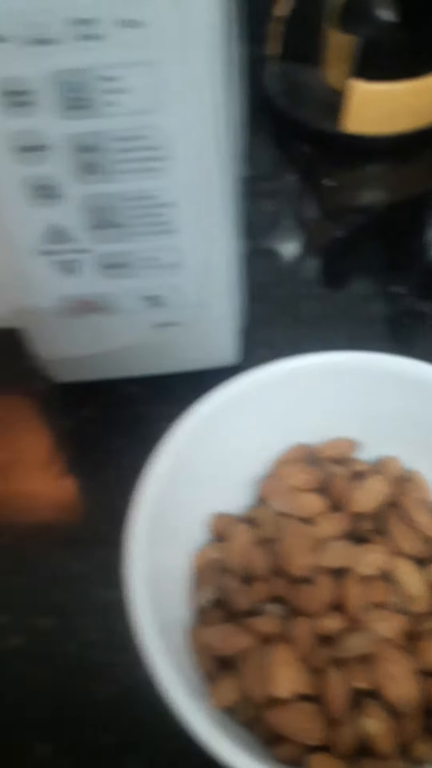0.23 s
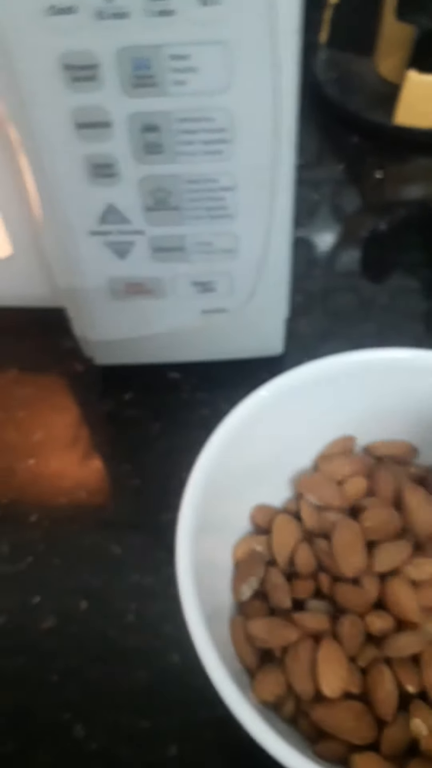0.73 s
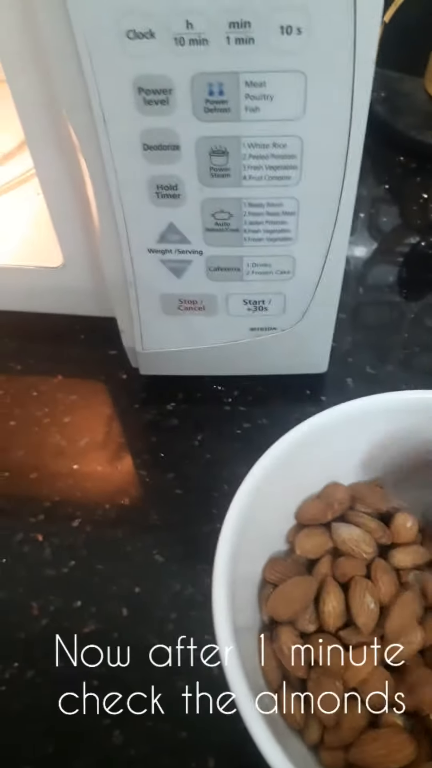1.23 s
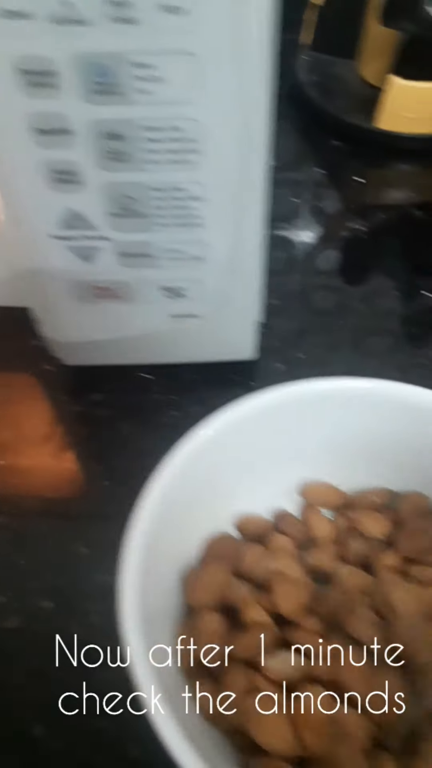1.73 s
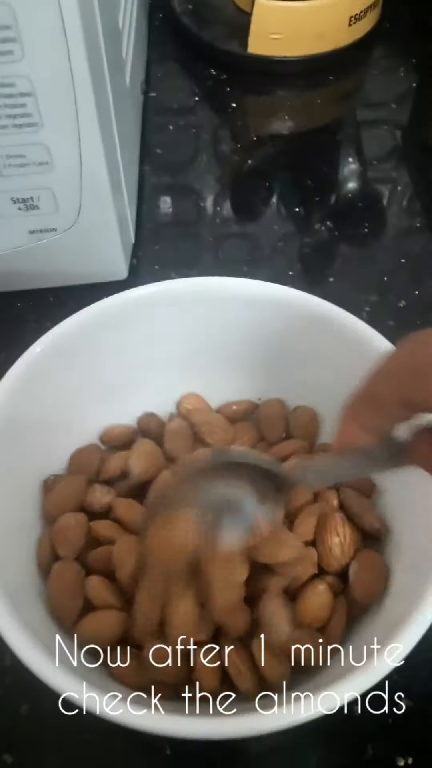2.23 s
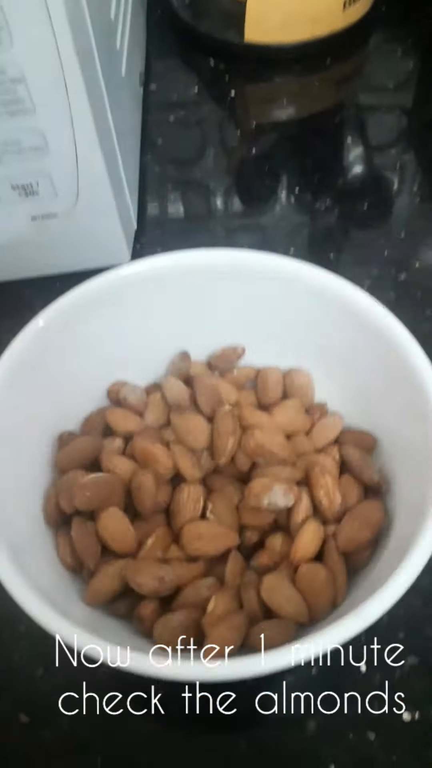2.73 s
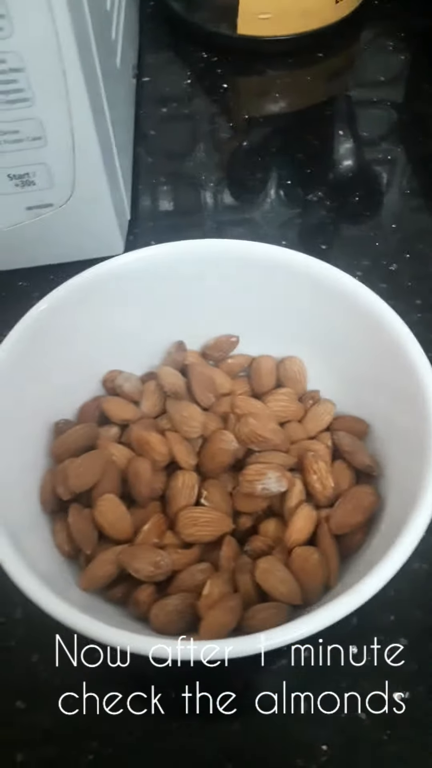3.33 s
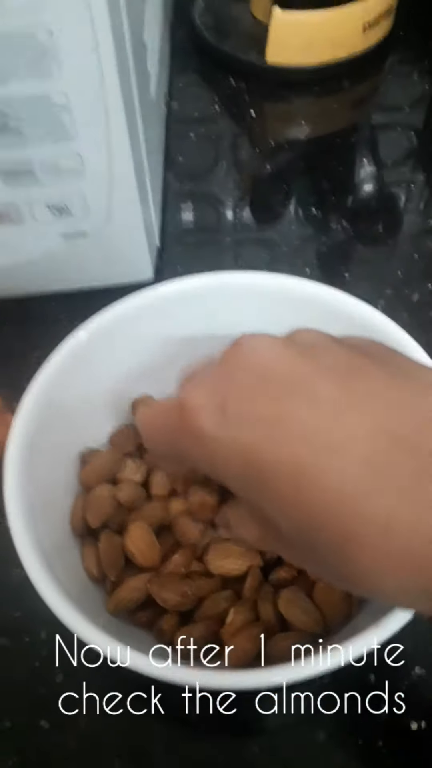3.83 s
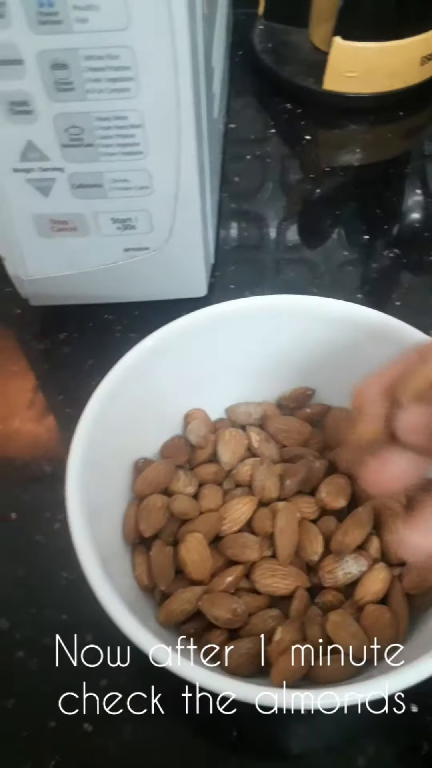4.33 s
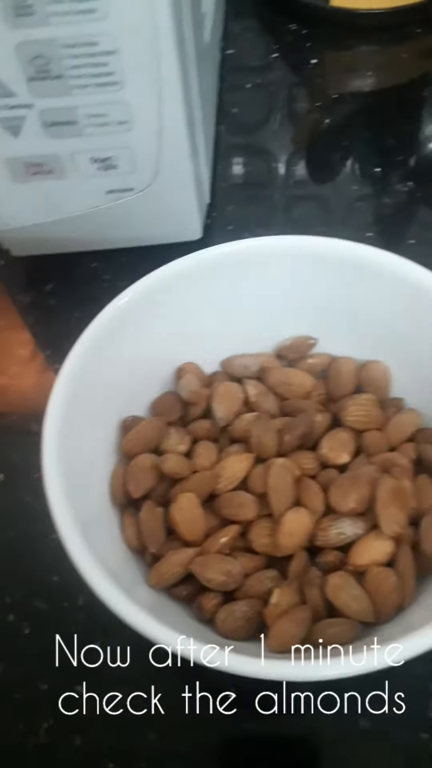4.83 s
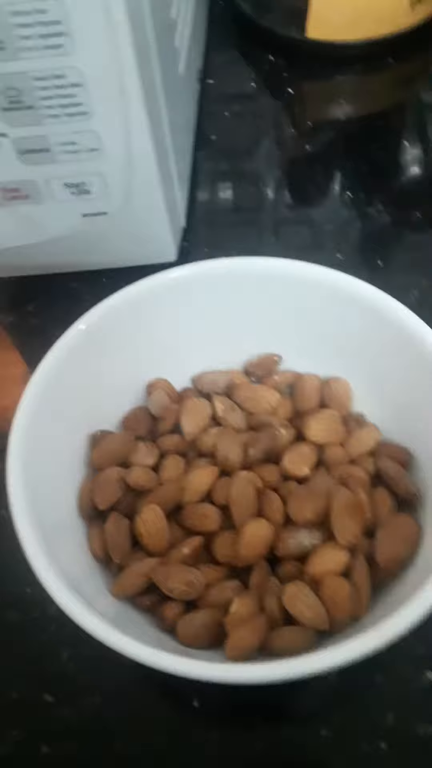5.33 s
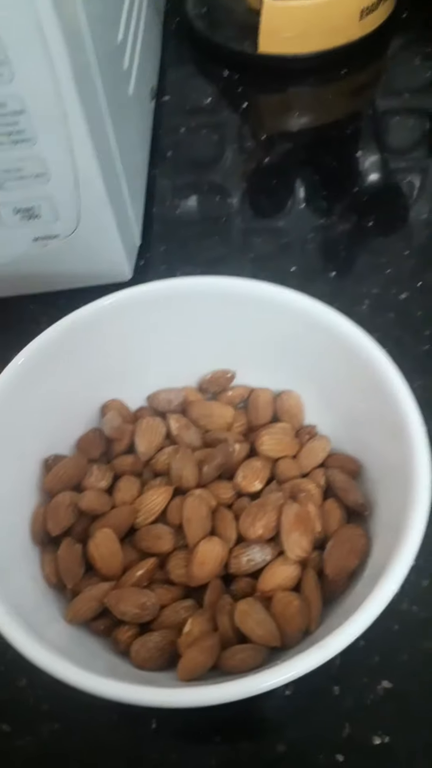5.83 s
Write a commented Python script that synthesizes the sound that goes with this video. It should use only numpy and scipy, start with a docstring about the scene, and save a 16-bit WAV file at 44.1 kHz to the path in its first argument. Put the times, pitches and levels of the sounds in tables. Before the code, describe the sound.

A small close microphone catches a metal spoon in a bowl of almonds: a sharp knock, gritty strokes, a bright ceramic chime, then softer stirring. A hard tap and a rapid metallic clatter follow as the spoon lands on the stone counter and rings out. Afterwards only soft nut rustle, faint fingertip hiss, small taps and a very low motor drone remain in the reverberant kitchen.

```python
"""A steel spoon stirs almonds in a ceramic bowl in a small hard-walled kitchen: damped modes knock, beating
pairs chime. Random grains driven through those modes and through a noise colour make the scrape and crunch of
the strokes. The spoon is put down on the stone counter, where it bounces, rings in freely dying modes and
chatters. Before, between and after, dry rubbing hisses in fine grains, a hand on the sliding spoon at first and
fingertips on almond skin later; fingers dig among the nuts once the spoon is down. A far motor drones as a sum
of harmonics over rumble and still air, and a low hum dies away at the outset."""
import sys
import numpy as np
from scipy import signal
from scipy.fft import rfft, irfft
from scipy.io import wavfile

SR = 44100
rng = np.random.default_rng(int(sys.argv[2]) if len(sys.argv) > 2 else 0)


def dump(signal):
    """Clip the signal to [-1, 1] and save it as 16-bit WAV at the path in sys.argv[1]."""
    limited = np.clip(np.atleast_2d(signal).T, -1, 1)
    pcm = np.round(limited * 32767).astype(np.int16)
    wavfile.write(sys.argv[1], SR, pcm)


N = 268083
TIME = np.arange(N) / SR

# Spoon touching the counter: (time [s], main mode level [dB], lift of the overtones [dB])
COUNTER_TOUCHES = [(0.086, -25.5, -19), (0.0894, -19.5, -8), (3.1897, -7, -10), (3.2177, -17, 5.5),
                   (3.2352, -10.5, -6), (3.2595, -20, 1.5), (3.2776, -15, -1.5), (3.3095, -16.5, 5),
                   (3.3245, -16.5, 0.5), (3.3385, -26, 2.5), (3.3589, -33, 17.5)]
# Noise colour of a hard contact: (frequency [Hz], relative density [dB per Hz])
CLICK_COLOUR = [(100, -25), (300, -17.5), (1000, -7.5), (2500, -4.5), (4000, -0.5), (6000, 6), (8300, -1),
                (9300, -13), (11000, -9.5), (15500, -16.5)]
# Strokes through the nuts: (start [s], length [s], relative scrape level [dB], relative crunch level [dB])
STIR_STROKES = [(0.631, 0.23, -43.5, -38), (0.965, 0.135, -44.5, -42.5), (1.271, 0.23, -47.5, -46.5),
                (1.604, 0.17, -49, -48.5), (1.981, 0.17, -48, -51.5), (2.278, 0.32, -44, -49.5)]
# Spoon held in the hand, damped by fingers and nuts: (frequency [Hz], relative level [dB], t60 [s])
HELD_SPOON_MODES = [(963, -20, 0.037), (1055, -22, 0.05), (1820, -17, 0.0069), (2620, -7, 0.03),
                    (2744, -8, 0.015), (5140, 3.5, 0.0069), (5450, -1, .015), (6750, -18, 0.067),
                    (9850, -17.5, 0.016), (11000, -15, 0.017), (13000, -9.5, 0.0061)]
# The bowl's chime: (frequency [Hz], relative level [dB], t60 [s], split of the mode pair [Hz],
# signed share of its twin [ratio])
BOWL_MODES = [(1346.5, -4.5, 0.7, 2, -0.7), (2491, -2, .72, 3.3, -.7), (3914, -4.5, 0.38, 6, 0.5),
              (5625, 2, 0.19, 13, 1), (7620, -16, 0.26, 13, .3), (9790, -30, .2, 12, -0.2),
              (10360, -28, 0.16, 12, 0.2), (12450, -29, 0.14, 15, 0.46)]
# Spoon against the bowl: (time [s], knock level [dB], contact sharpness [Hz], chime level [dB])
BOWL_TOUCHES = [(0.638, -33, 1200, -55), (0.668, -26.5, 6400, -57), (0.7, -3.5, 6400, -52.5),
                (0.8303, -21.5, 3220, -58), (0.849, -43.5, 3440, -45), (1.038, -27.5, 6050, -56.5),
                (1.131, -25.5, 2300, -52.5), (1.2624, -20, 14100, -54), (1.2653, -4.5, 13500, -17.5),
                (1.6208, -31.5, 2800, -48), (1.666, -33.5, 3200, -52), (1.992, -44.5, 2034, -62),
                (2.0141, -40, 5700, -68), (2.152, -43, 1370, -76), (2.2617, -43.5, 2980, -80),
                (2.295, -49, 6000, -53.5), (2.312, -33.5, 1490, -49.5), (2.3184, -34, 5000, -46),
                (2.3319, -39.5, 3393, -31.5), (2.579, -42.5, 2010, -57.5), (2.6684, -41, 8170, -64.5),
                (2.7826, -50.5, 2800, -75), (2.858, -47, 3600, -79), (4.4652, -37.5, 1230, -60),
                (4.575, -45, 2480, -88)]

NEUTRAL_CONTACT_HZ = 3400  # contact sharpness that leaves knock and chime untilted
LET_GO_S = 3.1  # the hand damps the spoon until this moment


def from_db(db):
    """Decibels to gain."""
    return 10 ** (np.asarray(db) / 20)


def rms_one(x):
    """Scale to unit power."""
    return x / np.sqrt(np.mean(x ** 2) + 1e-20)


def at_hz(points, hz, axis=1):
    """Read a column of a table on a log-frequency axis."""
    points = np.array(points)
    return np.interp(np.log(np.maximum(hz, 1)), np.log(points[:, 0]), points[:, axis])


def add(out, s, sound):
    """Mix a sound in at a time in seconds."""
    at = max(0, round(s * SR))
    out[at:at + len(sound)] += sound[:max(0, N - at)]


def colour(x, spectrum, tilt_db=0, size=2048):
    """Causal minimum-phase filter of unit power with the given spectrum, tilted per octave above 500 Hz."""
    hz = np.maximum(np.fft.rfftfreq(size, 1 / SR), 1)
    level_db = at_hz(spectrum, hz) + tilt_db * np.log2(np.maximum(hz, 500))
    gain = rms_one(from_db(level_db))
    # folding the cepstrum onto positive time gives the minimum phase
    cepstrum = irfft(np.log(gain + 1e-9))
    cepstrum[1:size // 2] *= 2
    cepstrum[size // 2 + 1:] = 0
    impulse = irfft(np.exp(rfft(cepstrum)))
    return signal.fftconvolve(x, impulse)[:len(x)]


def ring(modes, size=SR):
    """Struck modes (Hz, dB, t60) as dying sines of alternating sign."""
    t = TIME[:size]
    total = 0
    for k, (hz, db, t60) in enumerate(modes):
        decay = from_db(db - 60 * t / max(t60, 1e-3))
        total = total + (-1) ** k * decay * np.sin(2 * np.pi * hz * t)
    return total


def struck(modes, tilt_db):
    """Modes for one blow: tilted per octave, each randomised by about a decibel, total starting power 1."""
    hz, db, t60 = np.transpose(modes)
    db = db + tilt_db * np.log2(hz) + rng.standard_normal(len(hz))
    power_db = 10 * np.log10(np.sum(from_db(db) ** 2) / 2)
    return np.transpose([hz, db - power_db, t60])


def grains(per_s, spread_db):
    """Random tiny collisions of very uneven size and either sign, at unit power."""
    sizes = from_db(spread_db * np.minimum(rng.exponential(1, N), 4))
    signs = rng.choice([-1, 1], N)
    return rms_one(sizes * signs * (rng.random(N) < per_s / SR))


def background(turn_s=3.37, turn_width_s=0.86):
    """A far motor slows down, its harmonics shifting in weight, over rumble and the still air of the room."""
    # Motor harmonics: (multiple of the cycle rate, early level [dB], late level [dB])
    motor_orders = [(2, -5.5, -21.5), (3, -16.5, -15), (4, -10.5, -4.5), (5, -18.5, -2), (6, -9, -12.5),
                    (7, -15.5, -10.5)]
    # Loudness of the motor: (time [s], level [dB])
    motor_level = [(0, -68), (0.8, -71), (2.399, -68), (2.9, -51), (3.2, -55), (3.799, -67), (4.8, -71.5),
                   (5.4, -61), (6.08, -66)]
    # Noise colour of the room air: (frequency [Hz], relative density [dB per Hz])
    air_colour = [(15, -42), (25, -21), (48, -6), (145, -1.5), (285, 0), (439, -15), (516, -8), (677, -12),
                  (4370, -29.5), (6050, -20), (7920, -20.5), (9320, -29), (14400, -30.5), (16000, -22.5)]
    rumble_colour = [(25, -31), (45, -18.5), (70, -4.0), (150, 3.0), (300, 4),
                     (600, -15.5), (2000, -43.0), (8000, -67)]  # Hz, dB per Hz
    fast_hz, slow_hz, slowing_at_s, slowing_width_s = 34.9, 27.685, 4.9, 1

    slowed = .5 + .5 * np.tanh((TIME - slowing_at_s) / slowing_width_s)
    cycle_hz = fast_hz + (slow_hz - fast_hz) * slowed
    phase = 2 * np.pi * np.cumsum(cycle_hz) / SR
    late = .5 + .5 * np.tanh((TIME - turn_s) / turn_width_s)
    drone = np.zeros(N)
    for k, first_db, last_db in motor_orders:
        weight = from_db(first_db + (last_db - first_db) * late)
        drone += weight * np.sin(round(k) * phase + rng.uniform(0, 2 * np.pi))
    rumble = colour(rng.standard_normal(N), rumble_colour)
    s, db = np.transpose(motor_level)
    motor = from_db(np.interp(TIME, s, db)) * (drone + from_db(-15.5) * rumble)
    air = from_db(-72.5) * colour(rng.standard_normal(N), air_colour)
    return motor + air


def low_hum(blur_db=-55, blur_t60=.6):
    """A low hum of dying sines fades out at the outset, blurred by fading coloured noise."""
    # Modes of the hum: (frequency [Hz], level [dB], t60 [s])
    hum_modes = [(255, -51, 0.54), (295, -56, 1), (514, -61.5, 1), (526.7, -49.5, 0.44)]
    blur_colour = [(100, -24.0), (260, 4.0), (380, 12), (510, 20.5), (700, 6), (1100, 3),
                   (1400, -39.0), (3000, -14.0), (9000, -27)]  # Hz, dB per Hz
    blur = colour(rng.standard_normal(N), blur_colour)
    out = blur * from_db(blur_db - 60 * TIME / blur_t60)
    add(out, 0, ring(hum_modes))
    return out


def swell(middle, length):
    """Gain that rises and falls smoothly around a moment."""
    return np.exp(-2 * ((TIME - middle) / length) ** 2)


def rubbing():
    """Dry rubbing hisses in fine grains: the hand on the sliding spoon at the outset, later fingertips on
    almond skin."""
    # Dry rubs, of the hand on the spoon and of fingertips on the nuts: (middle [s], length [s], level [dB])
    rubs = [(0.01, 0.053, -55), (0.3, 0.42, -70), (4.681, 0.075, -63), (4.936, 0.3, -65.5),
            (5.48, 0.21, -68.5), (5.748, 0.18, -63), (5.994, 0.07, -73)]
    # Noise colour of the skin: (frequency [Hz], relative density [dB per Hz])
    skin_colour = [(880, -48), (1500, -9), (1670, -14), (2000, -11), (3030, -9.5), (3520, -11.5),
                   (5490, 1.5), (7840, -2), (8660, -7), (9370, -17.5), (11900, -6.5), (13900, -5),
                   (16000, -16)]
    effort = sum(from_db(db) * swell(s, length) for s, length, db in rubs)
    return effort * colour(grains(per_s=19000, spread_db=5.0), skin_colour)


def crack(t60, tilt_db, size=4096):
    """The brief broadband burst of a hard contact: dying noise, coloured."""
    burst = rng.standard_normal(size) * from_db(-60 * TIME[:size] / t60)
    return colour(burst, CLICK_COLOUR, tilt_db)


def spoon_on_counter(spread_db=6.0, click_db=-7, click_t60=0.027, choke_t60=0.01):
    """Each touch starts a click and a ring, damped by the hand or free; the next touch chokes that ring."""
    # Spoon ringing freely, main mode of its scoop first: (frequency [Hz], relative level [dB])
    free_spoon = [(6251, 0), (2490, -29), (3537, -19), (3698, -18), (5033, -9), (6121, -16), (7978, -20),
                  (8188, -21), (8455, -17), (9443, -18), (10008, -14), (10978, -13), (11370, -21),
                  (13850, -17), (14289, -12), (15423, -9), (15698, -1)]
    lies_flat_s = 3.35
    held_t60, free_t60, flat_t60 = 0.056, 0.89, 0.1  # s

    out = np.zeros(N)
    hz, db = np.transpose(free_spoon)
    is_overtone = hz != hz[0]
    next_touch = [row[0] for row in COUNTER_TOUCHES[1:]] + [TIME[-1]]
    for (s, ring_db, overtones_db), until in zip(COUNTER_TOUCHES, next_touch):
        if s < LET_GO_S:
            t60 = held_t60
        elif s < lies_flat_s:
            t60 = free_t60
        else:
            t60 = flat_t60
        variation = spread_db * rng.standard_normal(len(hz))
        strengths = ring_db + db + is_overtone * (overtones_db + variation)
        tone = ring([(f, level, t60) for f, level in zip(hz, strengths)], size=8192)
        past_next = np.maximum(TIME[:len(tone)] - (until - s), 0)
        add(out, s, tone * from_db(-60 * past_next / choke_t60))
        add(out, s, from_db(ring_db + click_db) * crack(click_t60, tilt_db=10.5))
    return out


def clatter(chatter_db=-33, growth_db_per_s=25, lasts_s=0.1775, stop_t60=0.05):
    """Spoon chatter on stone grows between the bounces, then stops; the handle sings after the first touch."""
    first_bounce_s = min(s for s, *_ in COUNTER_TOUCHES if s > LET_GO_S)
    t = TIME - first_bounce_s
    growth_db = growth_db_per_s * np.clip(t, 0, lasts_s)
    stop_db = 60 * np.maximum(t - lasts_s, 0) / stop_t60
    chatter = (t > 0) * from_db(chatter_db + growth_db - stop_db)
    out = colour(chatter * grains(per_s=400, spread_db=5.0), CLICK_COLOUR, tilt_db=2.5)
    add(out, COUNTER_TOUCHES[0][0], ring([(3545, -47.0, 0.31)]))  # handle
    return out


def taps(tap_t60=0.014):
    """Dry noise-burst taps that hardly ring, and dull bumps of three low counter modes."""
    # Dry taps on stone and nut shell: (time [s], level [dB], brightness [dB per octave])
    dry_taps = [(0.485, -57.5, -9), (2.9558, -15.5, -1.5), (3.2378, -29, -9.5), (3.703, -58.5, 9),
                (3.92, -45, -1.5), (5.493, -43.5, 3.5), (5.9722, -32, 16.5)]
    # Soft bumps through the counter: (time [s], relative level [dB])
    bumps = [(0.092, -43), (0.700, -63.5), (1.261, -52), (3.2374, -28.5), (5.492, -50)]
    counter_modes = [(98, 9, 0.014), (174.3, 7.5, 0.02), (294.3, 0.0, 0.042)]  # Hz, relative dB, t60 s
    out = np.zeros(N)
    for s, db, tilt_db in dry_taps:
        add(out, s, from_db(db) * crack(tap_t60, tilt_db))
    for s, db in bumps:
        add(out, s, from_db(db) * ring(counter_modes, size=8192))
    return out


def clumps(per_s=130, depth_db=14):
    """Nuts slip in short uneven spurts: a random gain at unit power."""
    knots = np.arange(0, TIME[-1], 1 / per_s)
    levels_db = depth_db * rng.random(len(knots))
    return rms_one(from_db(np.interp(TIME, knots, levels_db)))


def push(start, length, attack_s=0.04, sag_db_per_s=21, settle_db_per_s=169):
    """Gain of a push: it gathers speed, eases as the nuts give way, and stops as they settle."""
    t = np.maximum(TIME - start, 0)
    fall_db = sag_db_per_s * t + settle_db_per_s * np.maximum(t - length, 0)
    return np.minimum(t / attack_s, 1) * from_db(-fall_db)


def stirring(scrape_db=-8.0, crunch_db=-2.5, chime_db=-15):
    """Nuts tumble over each other as coloured grains and tick against the modes of spoon and bowl wall."""
    # Noise colour of tumbling nuts: (frequency [Hz], relative density [dB per Hz])
    crunch_colour = [(150, -25.5), (330, 1), (600, -3), (1500, -12), (3000, 0), (4000, -17), (5500, 6.5),
                     (7000, -5), (9000, -11.5), (11000, -8), (15500, -7)]
    spurts = clumps()
    scrape = spurts * sum(from_db(db) * push(s, length) for s, length, db, _ in STIR_STROKES)
    crunch = spurts * sum(from_db(db) * push(s, length) for s, length, _, db in STIR_STROKES)
    ticks = grains(per_s=590, spread_db=3.5)
    collisions = (ticks + grains(per_s=7000, spread_db=3.5)) / np.sqrt(2)
    out = from_db(crunch_db) * colour(crunch * collisions, crunch_colour)

    spoon = struck(HELD_SPOON_MODES, tilt_db=-9.5)
    bowl = struck(np.array(BOWL_MODES)[:, :3], tilt_db=-17)
    for modes, level_db in ((spoon, scrape_db), (bowl, chime_db)):
        norm = np.linalg.norm(ring(modes))
        for mode in modes[:6]:  # soft nuts reach only the lower modes, each tick with signs of its own
            blows = scrape * ticks * rng.choice([-1, 1], N)
            out += from_db(level_db) * signal.fftconvolve(blows, ring([mode]) / norm)[:N]
    return out


def knock(contact_hz, crack_db=-5, crack_t60=0.0078, order=4, tilt_db=1):
    """A contact cushioned by nuts lasts longer and so loses its treble; the knock keeps its energy."""
    # brightening in dB per octave for each doubling of sharpness
    brightness_db = tilt_db * np.log2(contact_hz / NEUTRAL_CONTACT_HZ)
    hard = ring(struck(HELD_SPOON_MODES, brightness_db), size=4096)
    hard = hard + from_db(crack_db) * crack(crack_t60, tilt_db=-2.0)
    lowpass = signal.butter(order, min(contact_hz, .45 * SR), fs=SR, output="sos")
    soft = signal.sosfilt(lowpass, hard)
    return soft * np.linalg.norm(hard) / np.linalg.norm(soft)


def clinks():
    """Each touch on the bowl knocks the damped spoon."""
    out = np.zeros(N)
    for s, knock_db, contact_hz, _ in BOWL_TOUCHES:
        add(out, s, from_db(knock_db) * knock(contact_hz))
    return out


def chimes(tilt_db=10):
    """Each touch chimes the bowl, whose slightly oval rim splits every mode into a beating pair."""
    out = np.zeros(N)
    split_hz, twin_share = np.array(BOWL_MODES)[:, 3:].T
    for s, _, contact_hz, chime_db in BOWL_TOUCHES:
        # sharper contacts chime brighter: dB per octave for each doubling of sharpness
        brightness_db = tilt_db * np.log2(contact_hz / NEUTRAL_CONTACT_HZ)
        modes = struck(np.array(BOWL_MODES)[:, :3], brightness_db)
        for (hz, db, t60), split, share in zip(modes, split_hz, twin_share):
            pair = ring([(hz, db, t60)]) + share * ring([(hz + split, db, t60)])
            add(out, s, from_db(chime_db) * pair)
    return out


def loose_nuts(knock_db=0.5, soft_hz=1200, hard_hz=6000, count=5):
    """In every stroke a few nuts tumble onto the spoon at random, some softly and some sharply."""
    out = np.zeros(N)
    for start, length, scrape_db, _ in STIR_STROKES:
        for when, hardness in rng.random((count, 2)):
            contact_hz = soft_hz * (hard_hz / soft_hz) ** hardness
            add(out, start + when * length, from_db(scrape_db + knock_db) * knock(contact_hz))
    return out


def picking(per_s=2500, spread_db=2.5):
    """Fingers push the nuts aside; they knock softly on each other as coloured grains."""
    # Fingers digging among the nuts: (start [s], length [s], level [dB])
    digs = [(3.633, 0.16, -56), (3.912, 0.045, -73.5), (4.11, 0.041, -84)]
    # Noise colour of nuts knocking together: (frequency [Hz], relative density [dB per Hz])
    nut_colour = [(200, -13), (700, -8), (1050, 3.5), (1700, -18.5), (2300, -9.5), (2900, 5), (4000, -22),
                  (5600, 1), (9300, -16.5), (12000, -15), (15500, -3)]
    effort = sum(from_db(db) * push(s, length) for s, length, db in digs)
    return colour(effort * clumps() * grains(per_s, spread_db), nut_colour)


def kitchen(x, gap_s=0.0023):
    """Dense reflections from hard walls: noise dying band by band after a short gap."""
    # Echo of the room: (frequency [Hz], t60 [s], level [dB])
    echo = [(150, 0.17, -3.5), (1008, .55, -1), (2500, 0.34, -1.5), (6100, 0.37, -10), (8600, 0.36, -4),
            (9900, 0.29, -9), (16000, 0.19, -4.5)]
    t, tail = TIME[:SR], 0
    white = rfft(rng.standard_normal(SR))
    bins = np.fft.rfftfreq(SR, 1 / SR)
    edges = np.geomspace(60, 18000, 18)  # Hz
    for low, high in zip(edges, edges[1:]):
        centre = np.sqrt(low * high)
        t60, db = at_hz(echo, centre, axis=1), at_hz(echo, centre, axis=2)
        band = irfft(white * (bins >= low) * (bins < high), SR)
        unit_energy = np.sqrt(2 * np.log(1000) / (t60 * SR))  # level independent of decay time
        tail = tail + band * from_db(db - 60 * t / t60) * unit_energy
    fade_in = np.clip(t / gap_s - 1, 0, 1)
    return signal.fftconvolve(x, tail * fade_in)[:N]


def scene():
    """Near sounds echo in the kitchen, hum and background are added dry; both channels are alike."""
    near = rubbing() + spoon_on_counter() + clatter() + taps()
    near = near + stirring() + clinks() + chimes() + loose_nuts() + picking()
    return np.tile(near + kitchen(near) + low_hum() + background(), (2, 1))


def record(dry, top=.88, low_cut_hz=45, cutoff_hz=15950):
    """The small microphone loses the deep bass; the loudest peaks are rounded and the top is cut."""
    highpass = signal.butter(3, low_cut_hz, "high", fs=SR, output="sos")
    dry = signal.sosfilt(highpass, dry)
    # rounding at twice the rate limits aliasing
    doubled = signal.resample_poly(dry, 2, 1, axis=1, window=("kaiser", 8))
    rounded = signal.resample_poly(top * np.tanh(doubled / top), 1, 2, axis=1)
    lowpass = signal.ellip(12, .1, 90, cutoff_hz, fs=SR, output="sos")
    return signal.sosfilt(lowpass, rounded)


dry = scene()
out = record(dry)
dump(out)
```